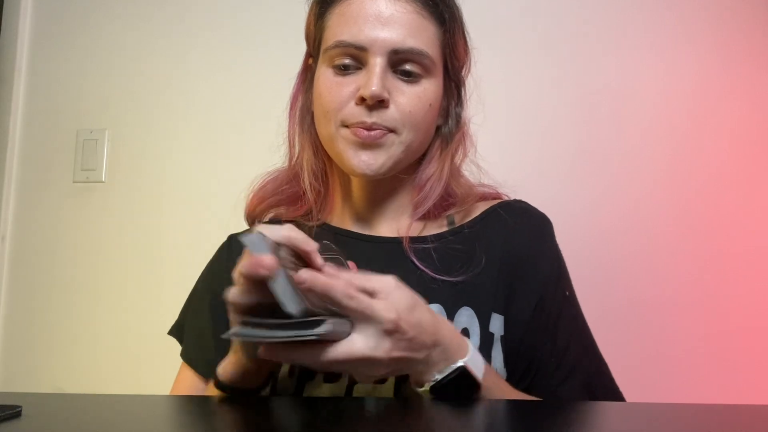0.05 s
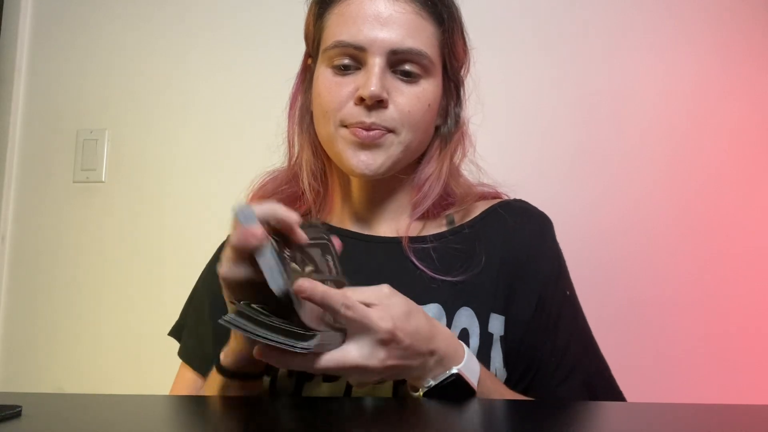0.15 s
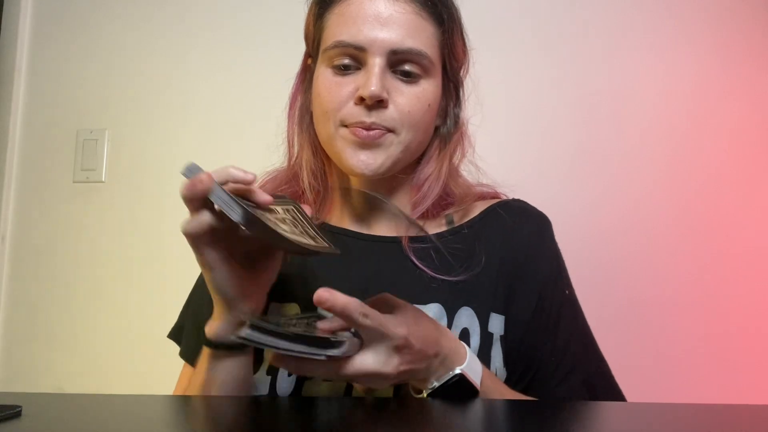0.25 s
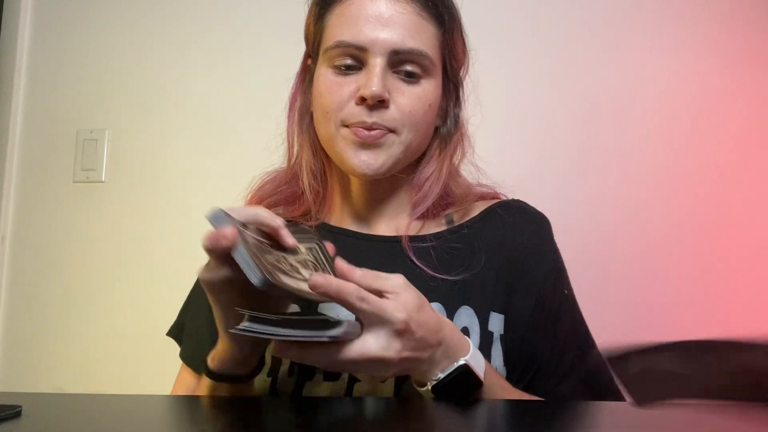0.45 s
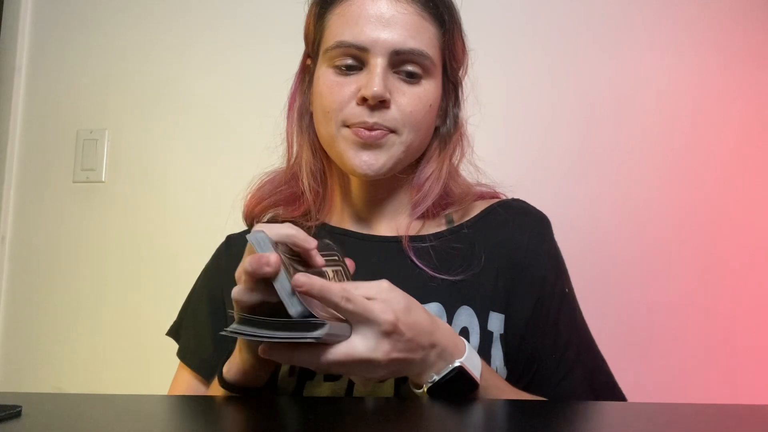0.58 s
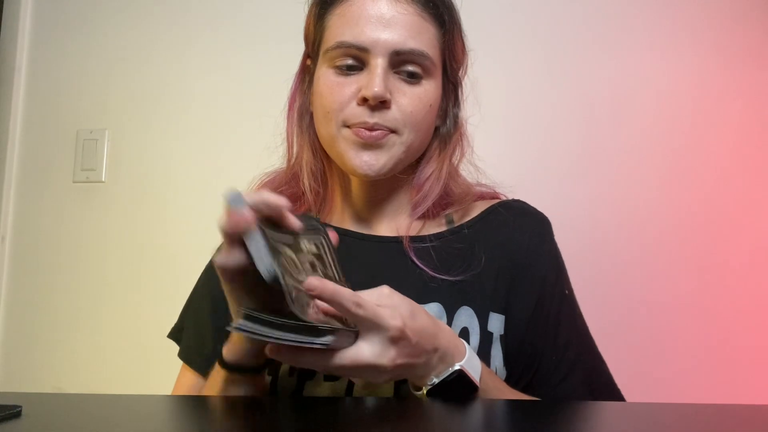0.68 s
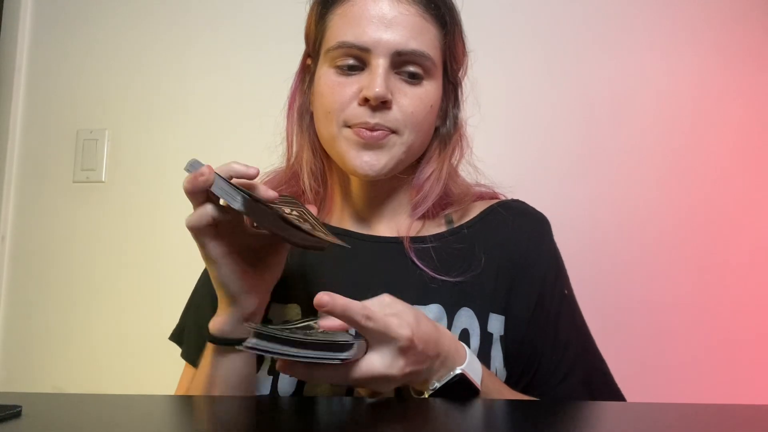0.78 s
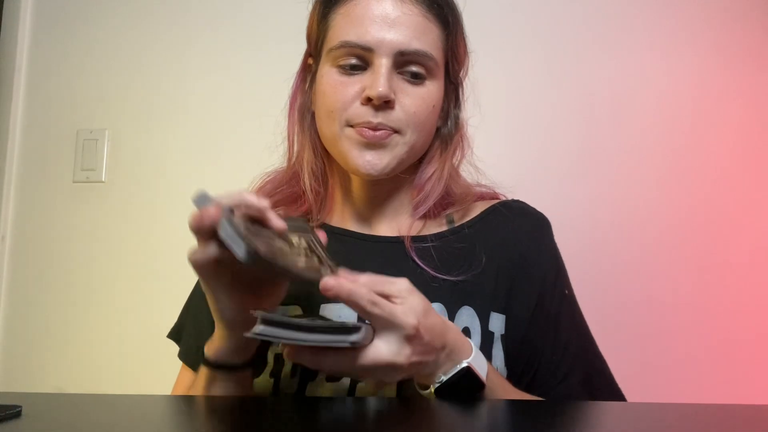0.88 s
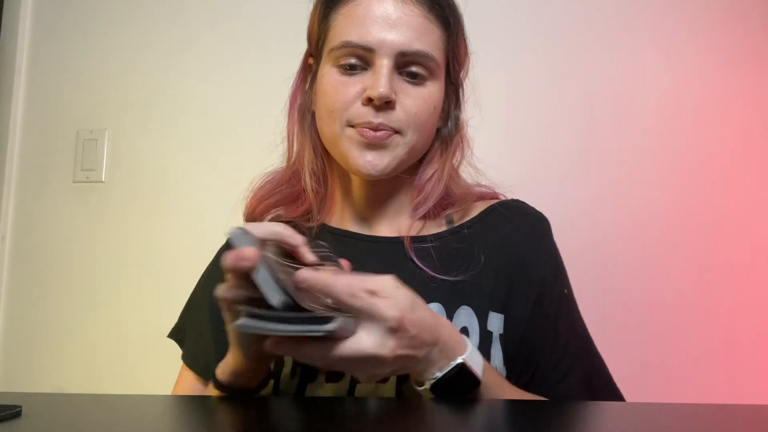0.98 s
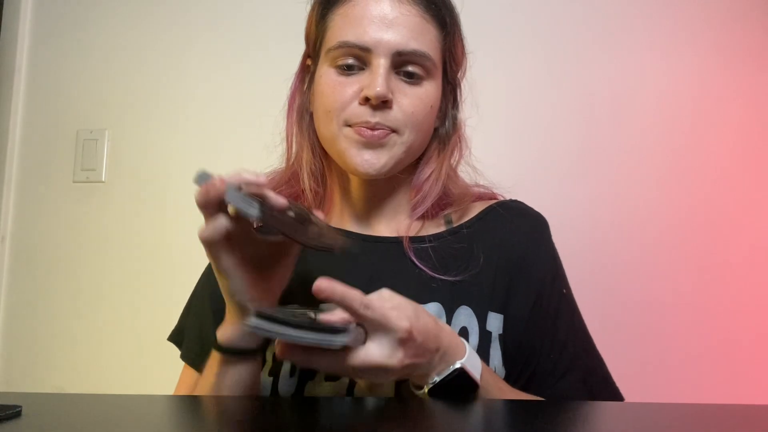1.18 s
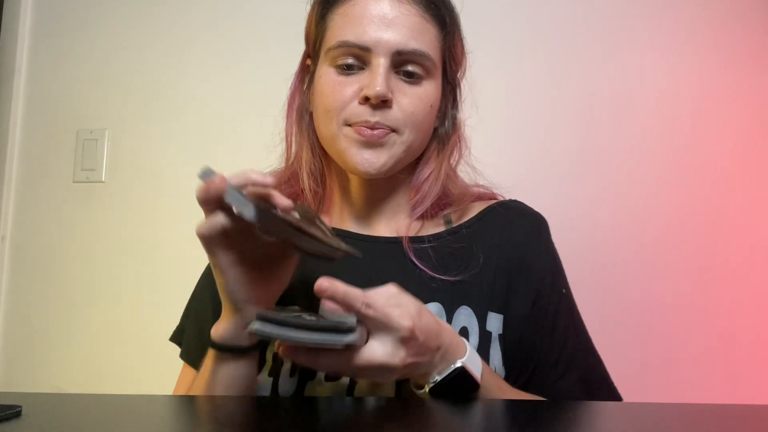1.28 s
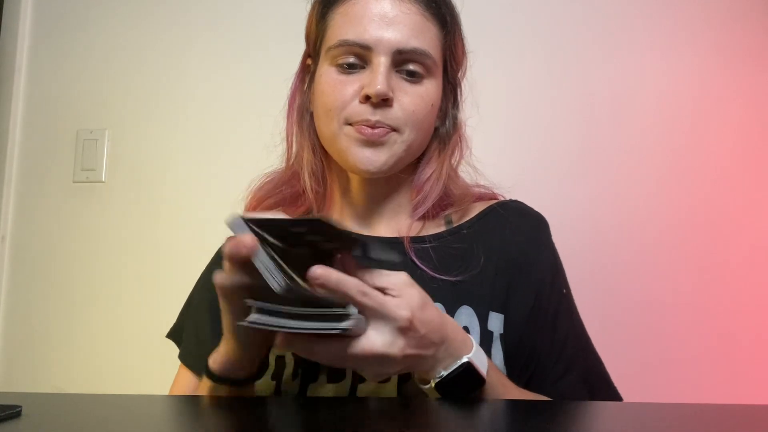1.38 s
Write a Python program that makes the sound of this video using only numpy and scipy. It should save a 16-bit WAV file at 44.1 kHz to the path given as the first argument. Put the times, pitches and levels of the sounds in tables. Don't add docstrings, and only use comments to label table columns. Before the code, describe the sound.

Stiff playing cards are shuffled overhand, close up in stereo. Soft rubbing leads to a clattering landing around 0.2 s, then the loudest hollow clack at 0.38. Lighter slaps follow at 0.47 and 0.53, edge ticks near 0.6, a firm cluster at 0.72, a softer one at 1.0, a sharp snap at 1.17 and faint contacts at 1.33 and 1.44. Small-room reflections, low wavering rumble.

```python
import sys
import numpy as np
from scipy import signal
from scipy.io import wavfile
from scipy.ndimage import uniform_filter1d

SR = 44100
rng = np.random.default_rng(int(sys.argv[2]) if len(sys.argv) > 2 else 0)


def output_pcm(signal):
    pcm = np.clip(np.atleast_2d(signal).T, -1, 1) * 32767
    wavfile.write(sys.argv[1], SR, np.round(pcm).astype(np.int16))


def convert_level_to_amplitude(level_db):
    exponent = np.asarray(level_db, float) / 20
    return 10 ** exponent


N = 63945

# pitch_hz, level_db
RUMBLE_SPECTRUM = [(12, -43.5), (20, -5.5), (70, -26), (114, -18.5), (408, -15.5), (476, -25.5), (664, -23),
                   (754, -24.5), (9000, -83.5), (11700, -107), (19800, -120)]
# pitch_hz, likeness [-1 to 1]
RUMBLE_LIKENESS = [(60, 1), (250, 0.8), (700, -0.55)]
# start_s, end_s, start_db, end_db, last_gap_hz
STROKES = [(0, 0.053, -70, -85, 2650), (0.049, 0.224, -60, -50.5, 3370), (0.237, 0.355, -91, -61.5, 2740),
           (0.43, 0.46, -58.5, -64.5, 2400), (0.517, 0.537, -55.5, -54, 2680),
           (0.554, 0.727, -57, -50.5, 3000), (0.715, 0.804, -42, -74, 2800), (0.961, 0.996, -57, -54, 2670),
           (1.039, 1.174, -58, -52.5, 3550), (1.15, 1.16, -55.5, -45.5, 3080),
           (1.331, 1.47, -59, -56.5, 3120)]
# pitch_hz, level_db
RUB_SPECTRUM = [(240, -65), (400, -3), (1200, -7.5), (2840, -1.5), (8370, -9.5), (10400, -24),
                (11300, -16.5), (14200, -7.5), (16000, -50.5)]
# pitch_hz, level_db
EDGE_SPECTRUM = [(1760, -3), (3000, -8), (4310, -5), (5840, -11.5), (6410, -9.5), (8040, -7.5),
                 (10200, -15), (12400, -12), (16400, -20)]
# start_s, level_db, flurry_ms
TICKS = [(.5635, -30, 1), (.582, -28, .8), (.6195, -31, .5), (.6485, -30, 1.2), (.038, -46, 3),
         (.9615, -44, 3), (.2185, -30, 1), (.2305, -22, 1.2), (.5345, -30, 3), (.7205, -27, 2),
         (.728, -30, 2), (.468, -30, 1), (1.1655, -16, .8), (1.0035, -32, 1.1), (1.4375, -42, 1.5),
         (1.3325, -44, 2), (.3608, -26, 1)]
# pitch_hz, level_db
FLICK_SPECTRUM = [(1200, -16), (3000, 7), (6000, 6), (8500, 5.5), (10500, 9), (13000, -2.5), (16000, 9)]
# start_s, level_db, pocket_hz, edge_db, flurry_ms
CLACKS = [(0.0798, -43, 3140, -0.5, 0.99), (.0712, -46, 1490, -30, 1.1), (.0383, -52, 1480, -3.5, 3.7),
          (.2265, -26.5, 4660, -36, 1.6), (0.2293, -32.5, 2070, -14, 6), (0.2317, -53, 2960, 2, 1),
          (0.2385, -46, 4330, -20, 1.1), (.3905, -28.5, 2500, -14.5, 2.5), (0.405, -43, 2800, -20, 2),
          (0.5284, -52.5, 3060, 0, 3), (1.3426, -47.5, 1467, -18, 2), (0.2048, -28.5, 2500, -15, 7.3),
          (0.2141, -22.5, 1670, -24, 8.2), (0.216, -22, 3170, -6, 0.57), (.2222, -25, 2370, -4, 3),
          (0.3603, -22.5, 3670, -11, 0.6), (0.3726, -20, 3070, -32, 13.7), (0.3791, -7, 2350, -56, 1.7),
          (0.3778, -12.5, 3750, -35, 1.2), (0.4671, -31, 2860, -35, 3.2), (0.5855, -28, 1630, -12, 2.4),
          (0.596, -36, 2370, -38, 3.9), (0.7126, -25.5, 2270, -11, 6.7), (0.7378, -41.5, 3010, -23.5, 2.2),
          (0.9997, -31.5, 1630, -13, 2.8), (1.0021, -29.5, 2790, -23, 3.9), (1.0128, -29.5, 2630, -18, 2.3),
          (1.1662, -12.5, 1900, -8, 1.05), (1.1704, -17.5, 2940, -3, 1.7), (1.1748, -33.5, 1630, -25, 5),
          (1.3333, -44, 1900, -6.5, 2.4), (0.3623, -25.5, 1840, -17, 7.5), (1.4373, -37, 1940, -23, 1.7)]
# start_s, end_s, first_hz, last_hz, level_db
SLITS = [(.09, 0.208, 2500, 3000, -88), (.15, 0.202, 3150, 4200, -58), (.105, 0.21, 8200, 8800, -61),
         (0.667, .735, 11800, 13500, -54), (1.078, 1.168, 2280, 3230, -55), (1.1, 1.165, 3320, 4260, -57.5),
         (1.345, 1.409, 1930, 4200, -59), (1.378, 1.441, 2300, 2370, -54.5),
         (1.392, 1.432, 4500, 4900, -55.5), (1.372, 1.425, 7900, 8400, -58.5),
         (1.39, 1.432, 12500, 13500, -73)]
# start_s, level_db, ring_hz
THUDS = [(1.0005, -39.5, 500), (.3835, -33.5, 540), (1.3425, -46, 756), (.2, -42.5, 253),
         (.229, -31.5, 376), (.237, -34, 206), (.364, -34, 297), (0.381, -23, 288), (0.473, -41.5, 323),
         (0.546, -42.5, 260), (0.7287, -36, 283), (.734, -36, 117), (1.004, -40, 200), (1.17, -29, 315)]
# start_s, level_db, knock_hz, flurry_ms
KNOCKS = [(0.2172, -16.5, 1254, 0.67), (0.2265, -19, 775, 3.9), (.362, -22.5, 605, 2.1),
          (.380, -13, 1150, 1.2), (0.3824, -16.5, 532, 3.8), (.4695, -27.5, 855, 2.7),
          (0.5346, -27.5, 1250, 6.2), (.540, -35.5, 590, 0.7), (0.7157, -22, 744, 3.9),
          (.7222, -21.5, 880, 0.99), (0.7264, -25, 780, 0.86), (1.0011, -29.5, 938, 4.4),
          (1.168, -17, 820, 1.2), (1.175, -21, 766, 0.75), (1.4374, -29.5, 546, 9.8)]
# start_s, level_db
BUMPS = [
    (0.237, -34.5),
    (0.383, -49.5),
    (0.607, -48.5),
    (0.731, -39.5),
    (1.176, -41.5),
]
# time_s, left_lag_samples, left_minus_right_db
HAND_PLACES = [
    (0.048, 3.34, 1.5),
    (0.219, 5.4, -3),
    (0.371, 22.55, -1),
    (0.551, 16, 0.5),
    (0.719, 2.46, -4),
    (1.001, 3.72, 0),
    (1.17, 24.5, -2),
    (1.4, 4.1, -0.5),
]
# pitch_hz, t60_s
ROOM_T60 = [(100, 0.56), (300, 0.3), (800, 0.24), (2000, 0.27), (5000, 0.3), (12000, 0.18)]
# pitch_hz, level_db
OVERALL_TONE = [(20, -14), (60, 0), (9600, 0), (9950, -16), (10900, -16), (11200, -2), (14400, -3),
                (14900, -13), (16300, -15), (16700, -80)]

LEAD_S = 0.006


def evened(x):
    return x / np.sqrt(np.mean(x ** 2) + 1e-20)


def peaked(x):
    return x / (abs(x).max() + 1e-12)


def read(points, hz):
    point_hz, value = np.transpose(points)
    return np.interp(np.log(hz + 1), np.log(point_hz + 1), value)


def add(mix, start_s, sound):
    part = mix[round(start_s * SR):][:len(sound)]
    part += sound[:len(part)]


def resonate(x, hz, width_hz):
    turn = np.exp(2j * np.pi * np.cumsum(hz * np.ones(len(x))) / SR)
    decay = np.exp(-np.pi * width_hz / SR)
    smooth = signal.lfilter([1 - decay], [1, -decay], x / turn)
    return 2 * (turn * smooth).real


def colour(x, points):
    level_db = read(points, abs(np.fft.fftfreq(2048, 1 / SR)))
    log_gain = np.log(convert_level_to_amplitude(np.maximum(level_db, -90)))
    phase = -signal.hilbert(log_gain).imag
    taps = np.fft.ifft(np.exp(log_gain + 1j * phase)).real[:1024]
    return signal.oaconvolve(x, taps)[:len(x)]


def rumble():
    rumble_db, hum_db, hum_hz, hum_width_hz = -52, -54.5, 58.4, 10.03
    frames, hz = N // 256 + 5, np.fft.rfftfreq(1024, 1 / SR)
    a, b, c, d = rng.standard_normal((frames, 513, 4)).T
    likeness = np.clip(read(RUMBLE_LIKENESS, hz), -1, 1)[:, None]
    left = a + 1j * b
    right = likeness * left + np.sqrt(1 - likeness ** 2) * (c + 1j * d)
    spectra = np.array([left, right]) * convert_level_to_amplitude(read(RUMBLE_SPECTRUM, hz)[:, None])
    noise = signal.istft(spectra, nperseg=1024, noverlap=768)[1][:, :N]
    hum = evened(resonate(resonate(rng.standard_normal(N), hum_hz, hum_width_hz), hum_hz, 30))
    both = convert_level_to_amplitude(rumble_db) * evened(noise) + convert_level_to_amplitude(hum_db) * hum * [[.7], [1.2]]
    return both * convert_level_to_amplitude([[-1.2], [1.2]])


def friction_grit():
    grit_per_s = 8100
    size = convert_level_to_amplitude(1.5 * np.minimum(rng.exponential(1, N), 3))
    catches = size * (rng.random(N) < grit_per_s / SR) * rng.choice([-1, 1], N)
    grit = evened(catches) + 0.14 * rng.standard_normal(N)
    unsteady_db = 1.79 * evened(uniform_filter1d(rng.standard_normal(N), 300))
    return grit * convert_level_to_amplitude(unsteady_db)


def slide():
    gap_rise, gap_q, whistle_share = 0.27, 6, 0.25
    let_go_s, sheen_per_db = 0.0069, 0.18
    t, out = np.arange(N) / SR, np.zeros(N)
    grit = friction_grit()
    rub = evened(colour(grit, RUB_SPECTRUM))
    sheen = evened(resonate(colour(grit, EDGE_SPECTRUM), 7600, 3100))
    for start, end, from_db, to_db, last_gap_hz in STROKES:
        along = np.clip((t - start) / (end - start), 0, 1)
        gap_hz = last_gap_hz * (1 - gap_rise * (1 - along))
        pressure_db = from_db + (to_db - from_db) * along
        whistle = evened(resonate(resonate(grit, gap_hz, 2000 / gap_q), gap_hz, 890))
        held = (t >= start) * np.exp(-np.maximum(t - end, 0) / let_go_s)
        bright = sheen_per_db * np.maximum(pressure_db + 58, 0) * sheen
        out += convert_level_to_amplitude(pressure_db) * held * (rub + whistle_share * whistle + bright)
    return out


def flurry(ms, dense=0):
    snaps_per_s = 1700
    t, draw = np.arange(3000) / SR - LEAD_S, rng.random((3, 3000))
    snaps = np.sign(draw[0] - .5) * (0.12 + draw[1]) * (draw[2] < snaps_per_s / SR)
    snaps[round(LEAD_S * SR) + np.array([0, 9])] = .45, -1
    snaps += dense * (draw[1] - .5)
    rush = np.exp(-t / (max(ms, .1) / 1000)) * np.minimum(0.35 + t / 0.001, 1)
    squeeze = .035 * (draw[0] - .5) * np.exp(t / .002)
    return np.where(t < 0, squeeze, snaps * rush)


def ticks():
    out = np.zeros(N)
    for start, db, ms in TICKS:
        flick = peaked(colour(flurry(ms, dense=1.1), FLICK_SPECTRUM))
        add(out, start - LEAD_S, convert_level_to_amplitude(db + 6) * flick)
    return out


def clacks():
    pocket_q, clack_db = 3.1, 1.5
    out = np.zeros(N)
    for start, db, hz, edge_db, ms in CLACKS:
        snaps = flurry(ms)
        pocket = peaked(resonate(resonate(snaps, hz, hz / pocket_q), hz, 1600))
        pocket += 0.25 * peaked(resonate(snaps, 3600, 1700))
        edge = convert_level_to_amplitude(edge_db + 14.5) * peaked(colour(snaps, EDGE_SPECTRUM))
        add(out, start - LEAD_S, convert_level_to_amplitude(db + clack_db) * (pocket + edge))
    return out


def slits():
    slit_q = 9
    out = np.zeros(N)
    for start, end, from_hz, to_hz, db in SLITS:
        along = np.linspace(0, 1, round((end - start) * SR))
        hz = from_hz + (to_hz - from_hz) * along
        air = rng.standard_normal(len(along))
        band = resonate(resonate(air, hz, to_hz / slit_q), hz, 2 * to_hz / slit_q)
        swell = np.sin(np.pi * along ** 0.72) ** .6
        add(out, start, convert_level_to_amplitude(db) * swell * evened(band))
    return out


def thuds():
    deck_q, thud_db = 1.86, 8
    t, out = np.arange(12000) / SR, np.zeros(N)
    for start, db, hz in THUDS:
        damping = np.exp(-np.pi * hz / deck_q * t)
        deck = np.sin(2 * np.pi * hz * t) * damping * np.minimum(t / 0.0013, 1)
        add(out, start, convert_level_to_amplitude(db + thud_db) * peaked(deck))
    return out


def knocks():
    knock_q = 2.77
    out = np.zeros(N)
    for start, db, hz, ms in KNOCKS:
        knock = resonate(resonate(flurry(ms), hz, hz / knock_q), hz, 2100)
        add(out, start - LEAD_S, convert_level_to_amplitude(db) * peaked(knock))
    return out


def bumps():
    table_hz, table_t60_s = 131, 0.24
    t, out = np.arange(12000) / SR, np.zeros(N)
    for start, db in BUMPS:
        ring = np.sin(2 * np.pi * table_hz * t) * (1 - np.exp(-t / 0.0016))
        add(out, start, convert_level_to_amplitude(db - 60 * t / table_t60_s) * ring)
    return out


def placed(x, lag, pan_db):
    echo_db, echo_hz = -8.5, 5000
    taps, at = np.zeros((2, 700)), rng.integers(15, 600, (2, 30))
    np.put_along_axis(taps, at, rng.choice([-1., 1.], at.shape) * np.exp(-at / 200), 1)
    taps = signal.lfilter(*signal.butter(2, echo_hz, fs=SR), taps + 0.07 * taps[::-1])
    taps *= convert_level_to_amplitude(echo_db) / np.linalg.norm(taps[0])
    taps[:, 0] = 1
    taps[0] = np.roll(taps[0], round(lag))
    return signal.oaconvolve(x[None], taps * convert_level_to_amplitude([[pan_db / 2], [-pan_db / 2]]), axes=1)[:, :N]


def from_hands(x):
    move_s = 0.04
    t = np.arange(N)[:, None] / SR
    nearest = np.argmin(abs(t - np.transpose(HAND_PLACES)[0]), axis=1)
    out = np.zeros((2, N))
    for k, (_, lag, pan_db) in enumerate(HAND_PLACES):
        share = np.sqrt(abs(uniform_filter1d(1. * (nearest == k), round(move_s * SR))))
        out += placed(x * share, lag, pan_db)
    return out


def room(x):
    room_db = -11
    taps = np.zeros((2, 22000))
    at = np.arange(200, 21960, 20) + rng.integers(0, 20, (2, 1088))
    np.put_along_axis(taps, at, rng.choice([-1., 1.], at.shape), 1)
    hz, t, z = signal.stft(taps, SR, nperseg=256)
    fade = convert_level_to_amplitude(-60 * t / np.maximum(read(ROOM_T60, hz), .03)[:, None])
    tail = signal.istft(z * fade, SR, nperseg=256)[1]
    tail *= convert_level_to_amplitude(room_db) / np.linalg.norm(tail[0])
    wet = signal.fftconvolve(x[None], tail, axes=1)[:, :N]
    side = (wet[0] - wet[1]) / 2
    bass = signal.sosfiltfilt(signal.butter(2, 450, fs=SR, output="sos"), side)
    return wet - .5 * np.array([bass, -bass])


def scene():
    background = rumble()
    cards = slide() + ticks() + clacks() + slits() + thuds() + knocks() + bumps()
    return from_hands(cards) + room(cards) + background


def thinned(x):
    drop_db, drop_hz = 21, 9500
    hz, t, z = signal.stft(x, SR, nperseg=512, noverlap=384)
    power = (abs(z) ** 2).mean(0)
    loud = power[hz > 1200].mean(0)
    smooth = uniform_filter1d(uniform_filter1d(power, 5, 0), 3, 1)
    weak = (smooth < loud * convert_level_to_amplitude(-2 * drop_db)) & (hz > drop_hz)[:, None]
    return signal.istft(z * ~weak, SR, nperseg=512, noverlap=384)[1][:, :N]


def top_cut(x):
    return signal.sosfilt(signal.butter(12, 16500, fs=SR, output="sos"), x)


def record(dry):
    heard = np.array([colour(x, OVERALL_TONE) for x in dry])
    return top_cut(thinned(heard))


dry = scene()
out = record(dry)
output_pcm(out)
```